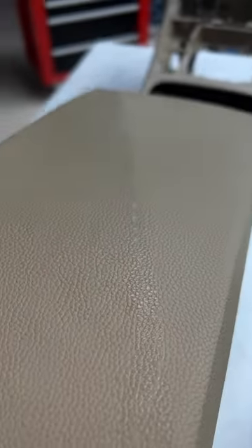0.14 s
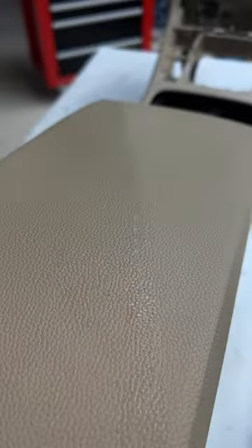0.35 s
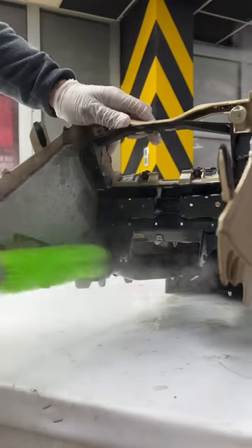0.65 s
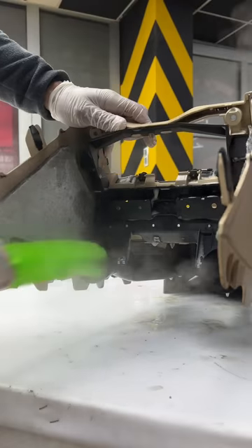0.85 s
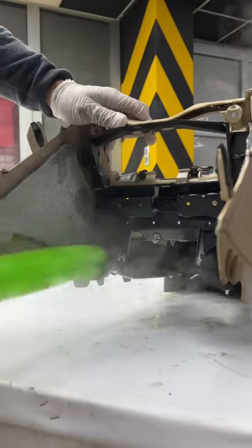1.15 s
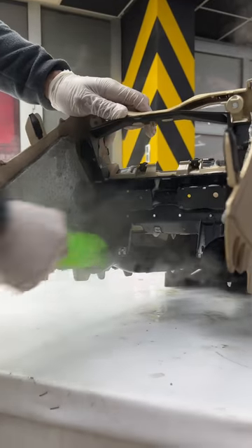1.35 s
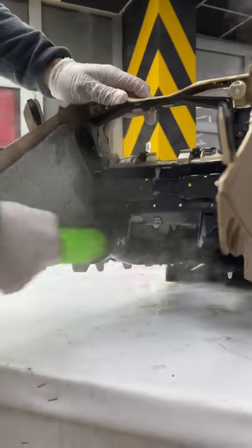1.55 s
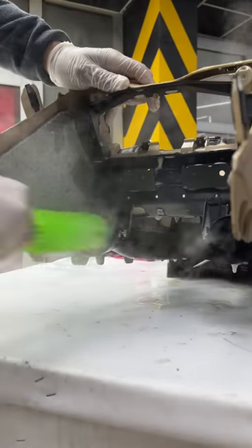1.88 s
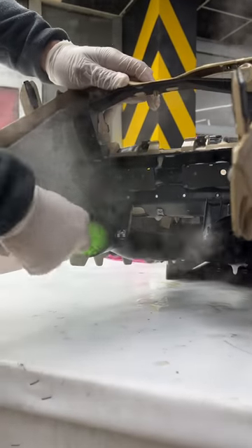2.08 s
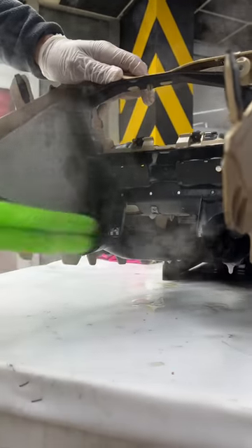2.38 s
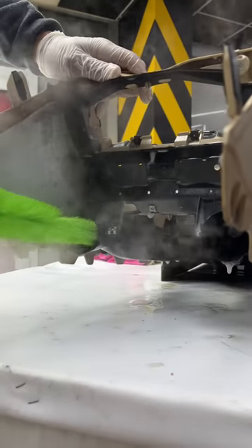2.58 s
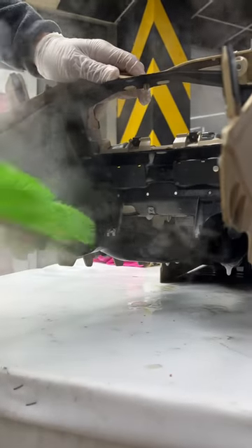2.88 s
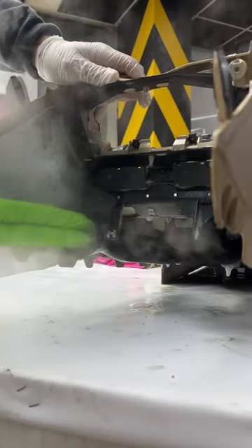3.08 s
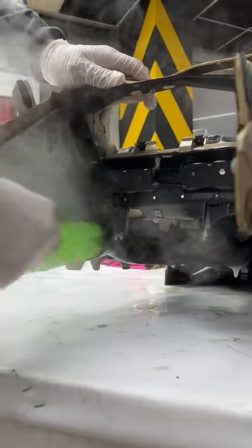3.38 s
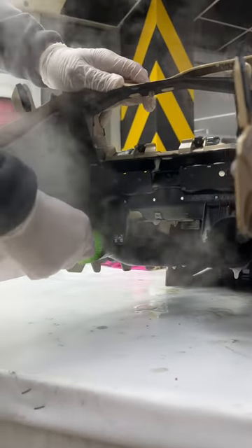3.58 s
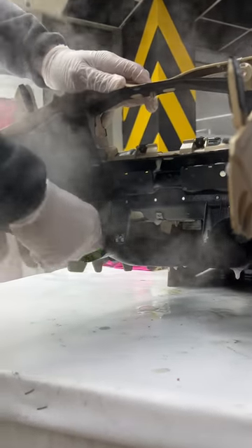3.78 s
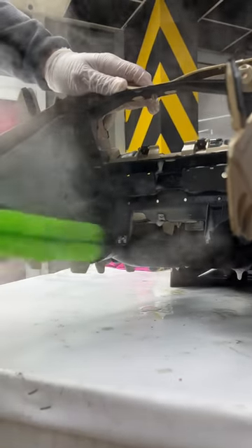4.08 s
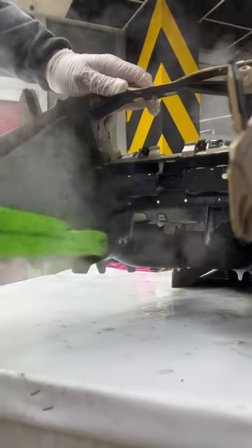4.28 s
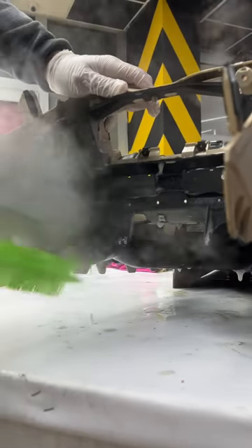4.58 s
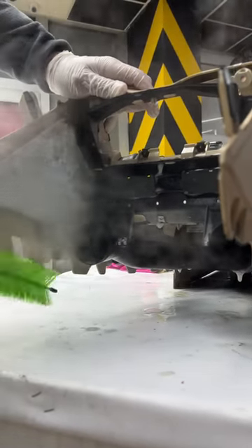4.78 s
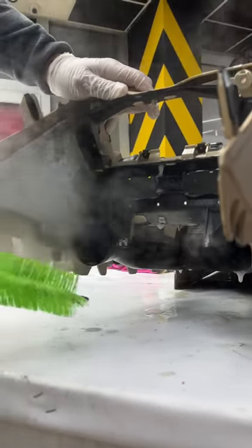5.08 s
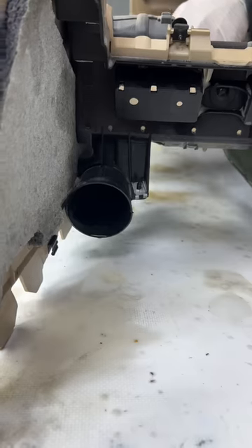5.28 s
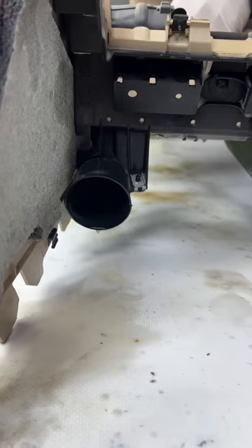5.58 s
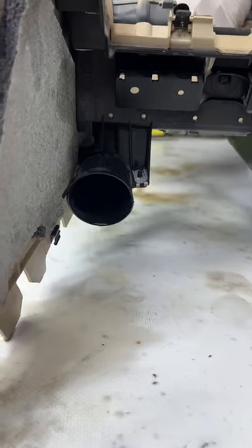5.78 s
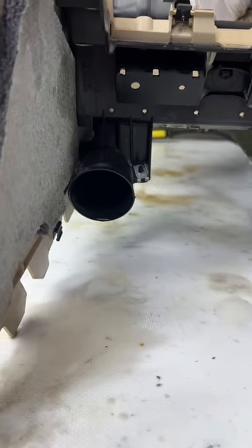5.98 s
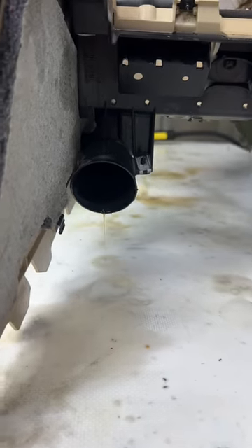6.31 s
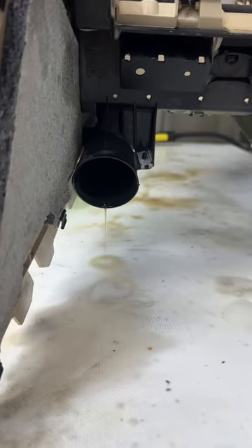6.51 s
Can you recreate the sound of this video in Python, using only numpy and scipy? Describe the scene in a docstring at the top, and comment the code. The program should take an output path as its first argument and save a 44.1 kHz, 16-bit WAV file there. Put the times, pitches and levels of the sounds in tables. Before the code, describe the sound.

In an indoor workshop, a very quiet moment of distant room noise and faint electrical hum cuts hard to a loud, close steam jet blowing through a plastic duct. A bottle brush scrubs in and out, scraping, briefly muffling the hiss and making it puff, with a few dull thuds. Another hard cut leaves quiet room noise, a soft low knock and water drops ticking on the table. Low rumble throughout.

```python
"""In a workshop, a steam jet blows through a plastic air duct while a bottle brush scrubs in and out.
Three scenes follow one another with hard cuts: a quiet room, the steam, then a dripping duct.
Steam, brush and rooms are noise shaped over pitch and time; the brush muffles the steam or makes it puff.
Faint steady tones, thuds and a knock on the table are sine waves; drops are ringing sines with a tick of noise.
A wavering bass rumble runs under everything."""
import sys
import numpy as np
from scipy import signal
from scipy.fft import rfft, irfft
from scipy.io import wavfile
from scipy.ndimage import uniform_filter1d

SR = 44100
rng = np.random.default_rng(int(sys.argv[2]) if len(sys.argv) > 2 else 0)


def inscribe(sig):
    """Save sig as 16-bit PCM at rate SR to the path in sys.argv[1].

    A 1-D sig is mono; a 2-D sig holds one channel per row.
    Samples are clipped to [-1, 1] before scaling.
    """
    pcm = np.round(np.clip(np.atleast_2d(sig).T, -1, 1) * 32767)
    wavfile.write(sys.argv[1], SR, pcm.astype(np.int16))


N = 293220
TIME = np.arange(N) / SR  # s
FRAMES = np.arange(N // 256 + 5) * 256 / SR - 256 / SR  # times of the short-time spectra, s
HZ = np.fft.rfftfreq(1024, 1 / SR)  # pitches in each of those spectra, Hz


def gain_of(db):
    """Turn decibels into a multiplier."""
    return 10 ** (np.asarray(db) / 20)


def evened(x):
    """Scale a signal to an rms of 1."""
    return x / np.sqrt(np.mean(x ** 2) + 1e-20)


def read(points):
    """Read a curve over pitch at every HZ, with straight lines on a log-frequency axis."""
    f, value = np.transpose(points)
    return np.interp(np.log(HZ + 1), np.log(f + 1), value)[:, None]


def follow(rows, column=1, t=TIME):
    """Read one column of a curve over time at the times t."""
    rows = np.array(rows)
    return np.interp(t, rows[:, 0], rows[:, column])


def resonances(modes):
    """Add up the power of resonances with steep skirts; gives dB, pitches x frames."""
    power = 0
    for hz, width, db in modes:
        distance = 2 * (HZ[:, None] - hz) / width
        power = power + gain_of(2 * db) / (1 + distance ** 2) ** 1.89
    return 10 * np.log10(power)


# how far left runs ahead of right: (frequency [Hz], phase lead [rad])
PHASE_LEAD = [(300, 0), (1100, 1.2), (2900, 1.1), (3700, -.3), (5000, -2), (7400, -1), (11100, -1.6),
              (15500, -1.6)]


def noise(shape_db, pan, same, patchy_db, ripple_db):
    """Stereo noise from random short-time spectra, with drifting patches and a fine ripple; mid rms 1."""
    a, b, c, d, patches, *ripple = rng.standard_normal((len(FRAMES), len(HZ), 7)).T
    patches = uniform_filter1d(patches, size=10, axis=0)
    patches = evened(uniform_filter1d(patches, size=12, axis=1))
    # the ripple of reflections differs left and right and changes slowly
    ripple = evened(uniform_filter1d(np.array(ripple), size=60, axis=2))
    alike = np.clip(same, -1, 1)
    left = a + 1j * b
    shared = alike * left * np.exp(-1j * read(PHASE_LEAD))
    right = shared + np.sqrt(1 - alike ** 2) * (c + 1j * d)
    balance_db = np.array([.5, -.5])[:, None, None] * read(pan)
    level_db = shape_db + patchy_db * patches + ripple_db * ripple + balance_db
    spectra = np.array([left, right]) * gain_of(level_db)
    sound = signal.istft(spectra, nperseg=1024, noverlap=768)[1][:, :N]
    return sound / np.sqrt(np.mean(sound.mean(0) ** 2))


def sputter(hz):
    """Random wobble, mostly slower than the given rate, rms 1."""
    return evened(signal.lfilter(*signal.butter(1, hz, fs=SR), rng.standard_normal(N)))


# tone colour of the first room: (frequency [Hz], relative level [dB per Hz])
FIRST_ROOM = [(70, -17), (140, -3), (300, -11), (600, -7), (900, -9), (1500, -17), (2100, -20), (2400, -24),
              (3000, -27), (4000, -36), (6000, -44), (10000, -46), (15500, -64.5)]
# stereo balance of both rooms: (frequency [Hz], left minus right [dB])
ROOM_PAN = [(60, -1.0), (180, -5), (550, -2.5), (1650, 1.5), (4970, 0), (15000, -1)]
# how alike left and right are in both rooms: (frequency [Hz], likeness [-1 to 1])
ROOM_SAME = [(60, 0.68), (240, 0.5), (950, -0.03), (3770, -0.18), (15000, 0.23)]
# mains hum and one thin high whine, before the scene's gain: (frequency [Hz], middle level [dB])
STEADY_TONES = [(200, -78), (250, -77), (450, -77), (550, -79), (600, -78), (1726, -86)]
FIRST_DB = -71.5  # room noise before the scene's gain


def first_room():
    """Distant workshop noise with mains hum and one thin high whine, as separately wavering sine waves."""
    tones = 0
    for hz, db in STEADY_TONES:
        level = gain_of(db + 2.5 * sputter(hz=5))
        tones = tones + level * np.sin(2 * np.pi * (hz * TIME + rng.random()))
    room = noise(read(FIRST_ROOM), ROOM_PAN, read(ROOM_SAME), patchy_db=2.0, ripple_db=1.5)
    return gain_of(FIRST_DB) * room + tones


# bass level before jolts and scene gains: (time [s], low lump [dB], middle lump [dB], high lump [dB])
RUMBLE = [(0.0, -76, -74.5, -76), (0.4, -70, -73, -80), (.5, -58.5, -61.5, -70.5), (1.6, -65, -68, -59),
          (2.07, -55, -63, -69), (2.8, -63.5, -67.5, -77), (3.76, -61, -71.5, -68), (4.3, -64, -65, -70),
          (5.13, -55.5, -69, -66), (5.2, -54, -51.5, -59), (5.74, -57.5, -50, -60.5), (5.89, -54, -63, -64),
          (6.09, -53.5, -48, -62.5), (6.43, -53, -63, -57), (6.52, -54, -46.5, -64),
          (6.65, -52.5, -51, -74)]
# where the three lumps of bass lie: (frequency [Hz], width [Hz])
RUMBLE_TONES = [(42, 36), (82, 46), (125, 45)]
# how much of a scrape's jolt each lump gets, low to high: [factor on dB]
JOLT_SHARE = [0.26, 1.046, 1]


def rumble():
    """Building and handling rumble: three nearly mono lumps of bass noise, jolted by each scrape."""
    out = 0
    f = np.fft.rfftfreq(N, 1 / SR)
    jolt_db = np.array(SCRAPES)[:, 3] @ scrape_shapes()
    for k, (hz, width) in enumerate(RUMBLE_TONES):
        spectra = rfft(rng.standard_normal((2, N)) * [[1], [.18]])
        mid, side = irfft(spectra / (1 + (2 * (f - hz) / width) ** 2) ** 2, N)
        level = gain_of(follow(RUMBLE, column=k + 1) + JOLT_SHARE[k] * jolt_db)
        out = out + level * np.array([0.82 * mid + side, 0.94 * mid - side]) / mid.std()
    return out


# steam with the duct open, before muffling, puffs and scene gains:
# (time [s], hiss [dB], upper duct modes [dB], lower duct modes [dB], roar of the duct mouth [dB])
STEAM = [(0.47, -24.5, -34.5, -36.5, -39), (0.95, -26.5, -35.5, -36.5, -43), (1.4, -26, -31, -37.5, -43.5),
         (1.68, -25.5, -31, -34.5, -43.5), (2.0, -27, -31, -38, -44), (2.38, -24.5, -30, -35.5, -42),
         (2.55, -27.5, -28.5, -32.5, -43), (2.84, -29, -27, -32, -48), (3.0, -27.5, -34.5, -33.5, -46.5),
         (3.18, -29, -36, -35, -46), (3.35, -26.5, -34.5, -38.5, -44), (3.55, -26.5, -40.5, -37.5, -41.5),
         (4.01, -24.5, -32.5, -37, -46), (4.3, -28.5, -35.5, -34, -46.5), (4.67, -29, -25, -33.5, -47.5),
         (5.06, -29, -35, -34.5, -45), (5.14, -24.5, -48, -34, -43), (5.2, -26, -46, -31.5, -44.5)]
# tone colour of the hiss: (frequency [Hz], relative level [dB per Hz])
HISS = [(880, -33.5), (1500, -3), (1670, -18), (2480, -15), (2940, -3.5), (4760, -2), (5260, -10),
        (7430, -1.5), (11500, 1.5), (15100, -1.5), (15900, -8.5)]
# upper air modes of the duct: (frequency [Hz], width [Hz], relative level [dB])
UPPER_MODES = [(3780, 400, -4.5), (4240, 430, -3), (4730, 1000, 1.5), (5950, 1500, -3), (6610, 2400, -4.5)]
# lower air modes of the duct: (frequency [Hz], width [Hz], relative level [dB])
LOWER_MODES = [(1306, 170, -5.5), (1768, 260, -6), (2022, 200, -5.5), (2462, 660, -2)]
# tone colour of the roar: (frequency [Hz], relative level [dB per Hz])
ROAR = [(260, -36), (450, -8.5), (502, -3.5), (623, 1.5), (715, 0), (783, 4.5), (975, -2), (1150, 0.5),
        (1500, -25), (2530, -120)]
# whistle of the nozzle: (time [s], frequency [Hz], level against the hiss [dB])
NOZZLE = [(0.47, 10900, -11), (0.64, 11260, -9.5), (2.6, 10700, -7), (2.84, 11730, -2), (4.06, 11000, -14),
          (4.92, 11400, 0.5), (5.2, 11340, -11)]
# stereo balance of steam and brush: (frequency [Hz], left minus right [dB])
STEAM_PAN = [(60, -2), (92, 5), (140, -6), (210, 2), (330, -2), (500, 3.5), (770, 4.5), (1170, 8),
             (1790, 7), (2740, 2.5), (4190, 2), (6410, -1.0), (9810, 0), (15000, 0.5)]
# lowest likeness of left and right in the steam: (frequency [Hz], likeness [0 to 1])
STEAM_SAME = [(60, 0.76), (180, 0.12), (550, 0.05), (1650, 0.02), (4970, 0.03), (15000, 0.01)]
# how much of the muffling the hiss, upper modes, lower modes and roar feel: [factor on dB]
PLUG_SHARE = [1.15, 0.69, 0.51, 0.2]
# how much of a puff those four layers get: [factor on dB]
PUFF_SHARE = [0.72, 0.82, 0.9, .9]
WHISTLE_WIDTH_HZ = 1100
DIRECT = .3  # share of steam that reaches left and right directly, before scrapes add to it (0-1)


def steam():
    """Turbulent hiss, a fuzzy nozzle whistle and the duct's air modes, all shaken by slugs of water."""
    direct = DIRECT + np.array(SCRAPES)[:, 5] @ scrape_shapes(FRAMES)
    same = np.maximum(read(STEAM_SAME), direct)
    nozzle = resonances([(follow(NOZZLE, t=FRAMES), WHISTLE_WIDTH_HZ, 0)])
    shapes = (nozzle, read(HISS), resonances(UPPER_MODES), resonances(LOWER_MODES), read(ROAR))
    whistle, *layers = (noise(shape_db, STEAM_PAN, same, patchy_db=1.91, ripple_db=4.0)
                        for shape_db in shapes)
    layers[0] = layers[0] + gain_of(follow(NOZZLE, column=2)) * whistle
    plug_db = plugged_db()
    puff_db = np.array(SCRAPES)[:, 4] @ scrape_shapes()
    jet = 0
    for k, layer in enumerate(layers):
        level_db = follow(STEAM, column=k + 1) - PLUG_SHARE[k] * plug_db + PUFF_SHARE[k] * puff_db
        jet = jet + gain_of(level_db) * layer
    return jet * gain_of(0.47 * sputter(hz=39.75))


# the brush pushed in: (time of deepest dip [s], half length [s], depth before each layer's share [dB])
PLUGS = [(.575, 0.049, 8), (0.811, 0.054, 5), (1.052, 0.043, 7.5), (1.276, 0.038, 5), (1.498, 0.042, 7.5),
         (1.79, 0.035, 0.5), (2.135, .09, 7), (3.064, 0.054, 1.5), (3.581, 0.11, 4), (3.789, 0.13, 8),
         (4.205, 0.043, 1)]
PLUG_EDGE = 2.2  # steepness of the dip's flanks


def plugged_db():
    """The brush blocks the duct and muffles the steam in smooth dips, in dB."""
    return sum(db * np.exp(-abs((TIME - s) / half) ** PLUG_EDGE) for s, half, db in PLUGS)


# brush dragged along the wall, jolt and puff before their shares:
# (time of peak [s], scrape level [dB], fade [s], jolt of the bass [dB], puff of steam [dB],
#  direct share gained [0 to 1])
SCRAPES = [(.47, -50.5, 0.089, 9, -0.5, .35), (.63, -45, 0.068, 11, 1.7, .25), (.86, -47.5, 0.12, 9, 2, .1),
           (1.12, -39.5, 0.019, 13, 1.5, .2), (1.29, -46.5, .15, 9.5, 3.5, .05),
           (1.52, -43.5, 0.089, 11, 1, .1), (1.86, -42.5, 0.094, 9, 2.5, .25),
           (2.26, -51, 0.071, 7, 0, .05), (3.02, -44.5, 0.02, 5.5, 5, .4), (3.84, -52, 0.25, 9, -0.64, .1),
           (3.93, -53.5, .05, 0, 3, .2), (4.05, -54.5, 0.017, 8, -1.5, .1), (4.63, -61, .1, 1, 1, .25)]
SCRAPE_RISE_S = 0.039


def scrape_shapes(t=TIME):
    """Each scrape swells exponentially and fades at its own pace: events x time, peak 1."""
    late = t - np.array(SCRAPES)[:, :1]
    fade_s = np.array(SCRAPES)[:, 2:3]
    return np.exp(np.where(late < 0, late / SCRAPE_RISE_S, -late / fade_s))


# steady drag under the scrapes: (time [s], level before the wobble [dB])
BRISTLES = [(.47, -51), (2.0, -59.5), (3.4, -53), (4.4, -62), (5.2, -57)]
# resonances of the duct wall: (frequency [Hz], width [Hz], relative level [dB])
WALL = [(210, 55, -5), (320.7, 42, -0.5), (596, 240, -8)]
# how alike left and right are in the brush: (frequency [Hz], likeness [0 to 1])
BRUSH_SAME = [(40, 0.71), (200, 0.6), (400, 0.47), (900, .2)]


def brush():
    """Bristles slip in clumps and shake the duct wall: wavering noise shaped by wall resonances."""
    wall = noise(resonances(WALL), STEAM_PAN, read(BRUSH_SAME), patchy_db=2.0, ripple_db=3.0)
    scrapes = gain_of(np.array(SCRAPES)[:, 1]) @ scrape_shapes()
    drag = gain_of(follow(BRISTLES)) + scrapes
    return drag * gain_of(1.2 * sputter(hz=30)) * wall


# brush handle hitting the duct:
# (time [s], level before the swell and decay [dB], ring [Hz], time to decay by 60 dB [s])
THUDS = [(1.09, -48.5, 75, .2), (3.835, -39, 78.5, 0.27), (4.021, -34, 128, 0.2)]


def thuds():
    """Dull knocks of the brush handle: low sine waves that swell quickly and die away."""
    t = np.maximum(TIME - np.array(THUDS)[:, :1], 0)
    db, hz, t60 = np.array(THUDS).T[1:, :, None]
    swell = 1 - np.exp(-t / 0.01)
    return (gain_of(db - 60 * t / t60) * swell * np.sin(2 * np.pi * hz * t)).sum(0)


# tone colour of the last room: (frequency [Hz], relative level [dB per Hz])
LAST_ROOM = [(90, -34), (177, -1.5), (279, -6.5), (336, -4), (553, -9.5), (1010, -9.5), (1960, -18),
             (2300, -21), (3600, -32), (5000, -45.5), (8000, -43), (13000, -52), (15500, -62)]
# loudness of its noise: (time [s], level [dB])
LAST_LEVEL = [(5.25, -58), (5.5, -58.5), (6.0, -59.5), (6.65, -57)]


def last_room():
    """Distant workshop noise, the knock on the table and the dripping water."""
    room = noise(read(LAST_ROOM), ROOM_PAN, read(ROOM_SAME), patchy_db=-0.5, ripple_db=3.0)
    return gain_of(follow(LAST_LEVEL)) * room + bump() + water()


def drop(hz, tick_db):
    """One drop: a broad tick of noise, two damped rings and a short, weak splash."""
    t = np.arange(1500) / SR
    band = signal.butter(2, [2600, 10500], "band", fs=SR)
    grit = signal.lfilter(*band, rng.standard_normal(1500))
    ring = np.sin(2 * np.pi * hz * t) + .5 * np.sin(2 * np.pi * 1.22 * hz * t)
    ring = ring * gain_of(-60 * t / .0095)
    tick_and_splash = grit * (gain_of(-60 * t / 0.012) + .06 * gain_of(-60 * t / .05))
    rise = np.clip(t / .0009, 0, 1) ** 2
    return rise * (ring + gain_of(tick_db) * tick_and_splash)


# loud drops on the table:
# (time [s], level before ring decay and stereo balance [dB], ring [Hz], tick gain against the ring [dB])
DRIPS = [(5.7632, -66, 3420, 2), (6.2276, -60, 3410, -6), (6.2396, -52, 3740, -4), (6.2709, -53, 3900, -4),
         (6.3104, -48, 3200, -2), (6.3978, -51, 3110, -3), (6.4453, -51, 3150, -3), (6.5470, -56, 2900, -8),
         (6.5962, -54, 2870, -7), (6.6266, -58, 2820, -8)]
# loudness of the tiny drops before stereo balance: (time [s], level [dB])
TRICKLE = [(5.4, -87), (5.684, -78), (5.886, -92.5), (6.188, -83), (6.348, -73), (6.46, -76), (6.649, -79)]


def water():
    """Loud drops over a thin trickle of tiny ones, which fall at random in 16 pitches."""
    out = np.zeros(N + 1500)
    for s, db, hz, tick_db in DRIPS:
        start = round(s * SR)
        out[start:start + 1500] += gain_of(db) * drop(hz, tick_db)
    falls = rng.exponential(1, (16, N))
    size = gain_of(2.2 * falls) * (rng.random((16, N)) < 150 / SR)  # about 150 drops/s per pitch
    tiny = sum(signal.oaconvolve(row, drop(rng.uniform(2800, 4270), -13.0))[:N] for row in size)
    wet = out[:N] + gain_of(follow(TRICKLE)) * evened(tiny)
    # left is louder and two samples late
    return np.array([gain_of(1.2) * np.roll(wet, shift=2), gain_of(-1.2) * wet])


# rings of the knock: (frequency [Hz], relative level [dB], time to decay by 60 dB [s])
BUMP = [(84, 4, 0.16), (164, 10, 0.078), (320, -2, 0.094), (520, -10, 0.043)]
BUMP_S, BUMP_DB = 5.332, -40  # start in s, level before the rings' own levels in dB


def bump():
    """The bumped duct knocks dully and bounces twice: damped low sine waves, repeated more softly."""
    t = np.maximum(TIME - BUMP_S - np.array([[0], [.0125], [.037]]), 0)
    swell = 1 - np.exp(-t / 0.0016)
    rings = sum(gain_of(db - 60 * t / t60) * swell * np.sin(2 * np.pi * hz * t) for hz, db, t60 in BUMP)
    knock = (gain_of([[0], [-2], [-7]]) * rings).sum(0)
    return gain_of(BUMP_DB) * knock * gain_of([[-1.2], [1.2]])  # a little louder on the right


FADE_S = .001  # fade at each end of a piece


def heard(pieces):
    """Loudness of a scene over time: its pieces, each faded in and out, added up."""
    gain = 0
    for start, end, db in pieces:
        inside = np.minimum(TIME - start, end - TIME)
        gain = gain + gain_of(db) * np.clip(inside / FADE_S + .5, 0, 1)
    return gain


# the pieces of the quiet room that are heard: (start [s], end [s], gain [dB])
FIRST_PIECES = [(-.01, .427, 10), (.427, .432, -35)]
# the pieces of the steam scene: (start [s], end [s], gain [dB])
STEAM_PIECES = [(.4365, .4507, 1), (.4507, .4545, -29), (.4545, .4605, -17), (.4605, 5.1967, 0),
                (5.197, 5.2203, -31), (5.209, 5.2125, -18), (5.2203, 5.235, -54)]
# the pieces of the dripping scene: (start [s], end [s], gain [dB])
LAST_PIECES = [(5.199, 5.22, 1), (5.22, 5.229, -17), (5.229, 6.644, 0)]


def scene():
    """Play the quiet room, the steam and the dripping in turn, with the same rumble under each."""
    low = rumble()
    scenes = ((FIRST_PIECES, first_room()),
              (STEAM_PIECES, steam() + brush() + thuds()),
              (LAST_PIECES, last_room()))
    return sum(heard(pieces) * (sound + low) for pieces, sound in scenes)


EDGE_HZ = 15950


def record(dry):
    """Cut away the treble above the band edge with a steep low-pass filter."""
    low_pass = signal.firwin(511, EDGE_HZ, window=("kaiser", 9), fs=SR)
    return signal.oaconvolve(dry, low_pass[None], "same")


dry = scene()
out = record(dry)
inscribe(out)
```